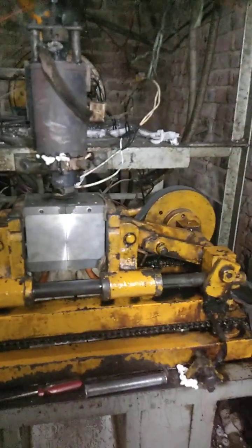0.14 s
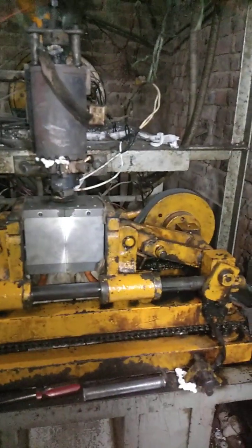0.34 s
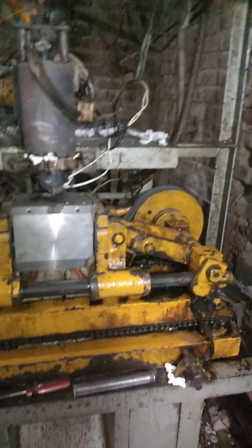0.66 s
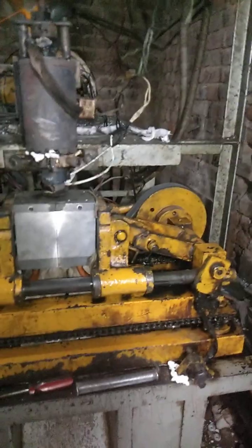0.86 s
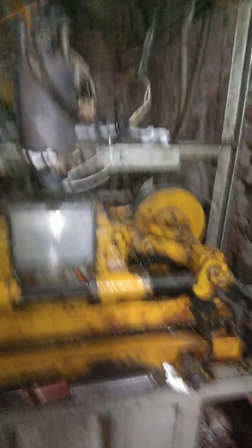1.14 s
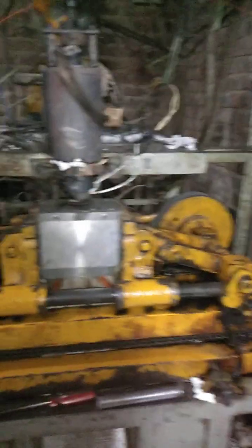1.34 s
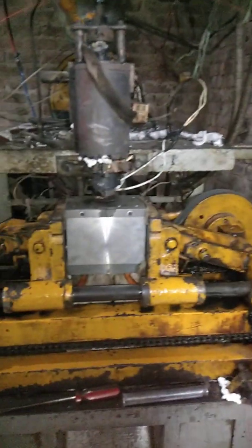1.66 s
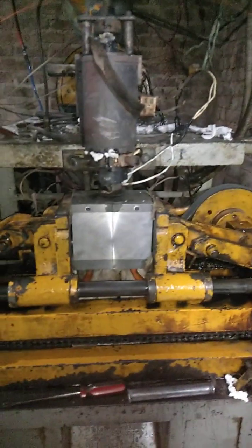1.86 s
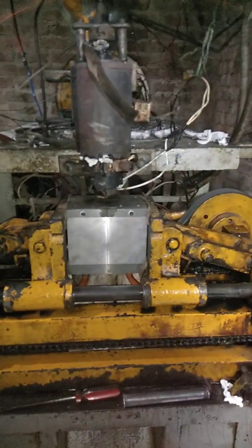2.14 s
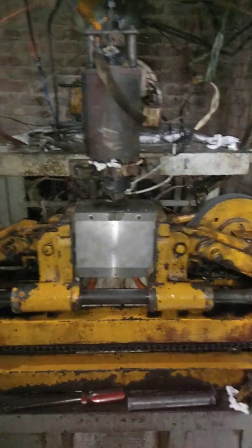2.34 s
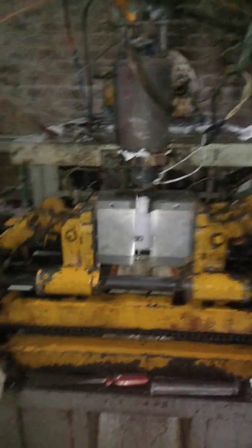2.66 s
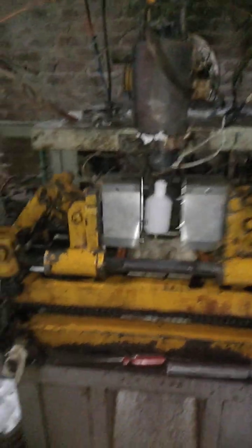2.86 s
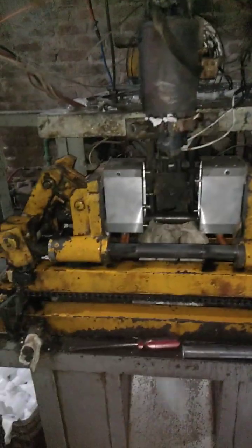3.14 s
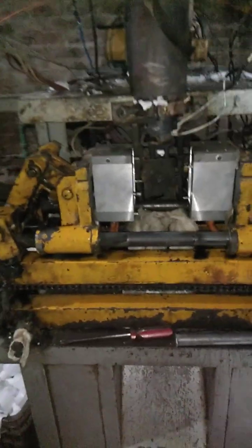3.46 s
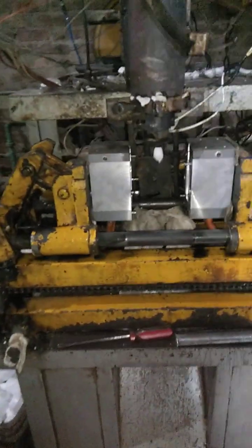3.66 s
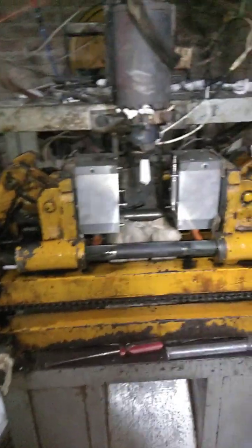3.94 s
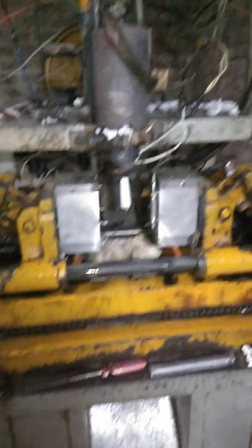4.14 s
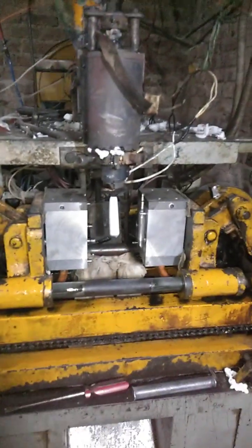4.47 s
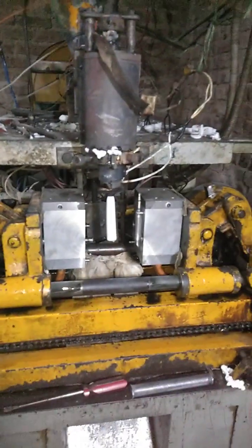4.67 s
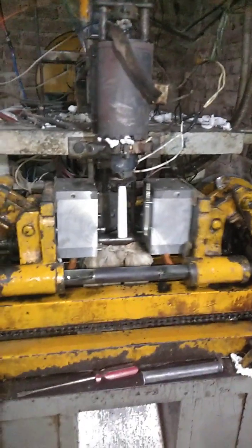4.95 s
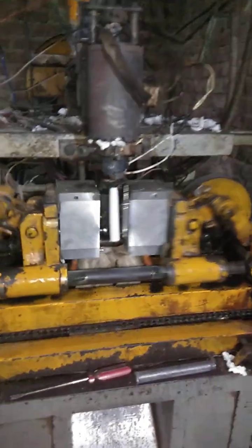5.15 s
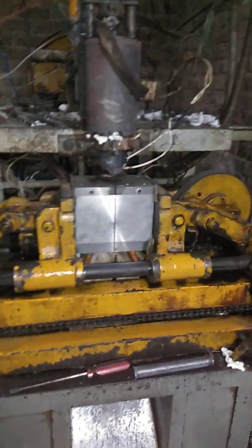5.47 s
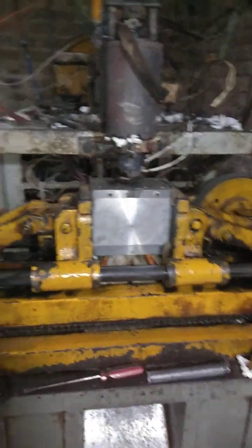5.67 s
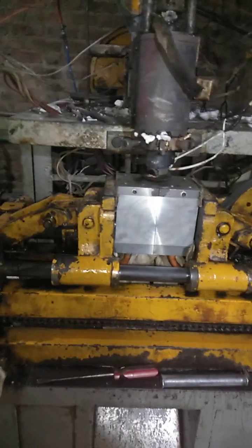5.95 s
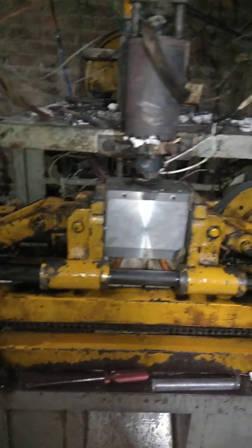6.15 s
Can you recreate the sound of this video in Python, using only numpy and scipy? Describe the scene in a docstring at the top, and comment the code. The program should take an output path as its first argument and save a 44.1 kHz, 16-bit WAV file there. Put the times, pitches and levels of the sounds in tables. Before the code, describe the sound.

Over a quiet workshop hum, a few faint clicks lead to a clank and a sudden burst of air that trails into a hiss. A blow-moulding machine's geared motor starts rumbling and whining, its chain rattling. Loud air puffs fire as the mould halves clang against their stops. The drive runs on with scattered steel knocks, then eases, with a tiny squeak and a soft swell of air. The sound is mono, with a short room echo.

```python
"""A blow-moulding machine in a quiet workshop. Over the room's hum come a few faint clicks, then a valve
dumps the blowing air in a burst and a long hiss. A geared motor rumbles and whines, its chain rattling
as it pulls the mould open. An air jet puffs the bottle out while the mould halves ring on their stops.
The mould closes, a slide squeaks, and fresh blowing air swells. All through the cycle, links, latches
and stops knock the steel frame."""
import sys
import numpy as np
from scipy import signal
from scipy.fft import rfft, irfft, next_fast_len
from scipy.io import wavfile
from scipy.ndimage import uniform_filter1d, map_coordinates

SR = 44100
rng = np.random.default_rng(int(sys.argv[2]) if len(sys.argv) > 2 else 0)


def bounce(signal):
    """Save signal as a 16-bit WAV file at the path given by the first command-line argument."""
    frames = np.transpose(np.atleast_2d(signal))
    limited = np.clip(frames, -1, 1)
    pcm = np.round(limited * 32767).astype(np.int16)
    wavfile.write(sys.argv[1], SR, pcm)


N = 278477
T = np.arange(N) / SR

# Noise colours. Each row: frequency in Hz, relative level in dB.
ROOM_COLOUR = [(15, -45), (25, -21.5), (53, -1.5), (221, -13.5), (390, -13), (568, -18), (616, -15),
               (785, -16), (851, -16), (1110, -18), (1210, -16.5), (9350, -22.5), (10400, -27),
               (12600, -32), (15600, -22.5)]
VENT_COLOUR = [(410, -25), (700, -18), (840, -16), (1470, -17), (1950, -8), (2850, -10), (3550, -7.5),
               (4910, -7), (6200, -4.5), (8150, -8), (10700, -25.5), (14100, -34.5), (15600, -30)]
RUMBLE_COLOUR = [(59, -46), (100, -7.5), (169, -0.5), (338, -8.5), (462, -4.5), (550, -9), (663, -4),
                 (788, -13.5), (1600, -23.5), (2080, -20), (3520, -120)]
CHAIN_COLOUR = [(530, -4.5), (900, 2), (1230, -8), (1330, -7), (1630, -5.5), (1880, -4.5), (2540, -7.5),
                (3850, -15.5), (5770, -27.5), (7770, -30), (8340, -36), (10700, -50.5), (15500, -43.5)]
EJECTOR_COLOUR = [(710, -21), (1200, -13.5), (1690, -12), (2210, -3), (2830, -2.5), (3990, -1), (4950, -3),
                  (6130, -1.5), (7200, -4), (7770, 0.5), (10600, -12), (13400, -17), (15600, -7)]
BLOW_COLOUR = [(880, -45), (1500, -13.5), (2420, -3), (2890, -7), (2980, -9), (5740, 3), (6920, -7),
               (8090, -7), (10100, -27), (15600, -15)]
# Resonances of steel and air cavities. Each row: pitch in Hz, width in Hz, relative level in dB.
STEEL_MODES = [(111, 29, 1), (168.3, 21, 3), (264, 112, -6.5), (332.5, 29, 0), (356, 111, -4),
               (452, 48, 0.5), (541, 58, -4), (651, 70, -5), (828, 27, 7), (1025, 74, 5), (1290, 170, 2),
               (1702, 123, -1.5), (1946, 93, 0.5), (2120, 118, 1.5), (2310, 116, 2.5), (2620, 170, -2.5),
               (2855, 81, 5), (3200, 190, 5.5), (3604, 87, 8.5), (4180, 920, 6), (5280, 340, 4),
               (5550, 200, -0.5), (6170, 75, 13), (6390, 930, 3), (7210, 300, 6.5), (7550, 95, 12),
               (8250, 380, 3), (8760, 270, 7), (10200, 4200, -3.5), (15000, 1500, -8)]
VALVE_CAVITIES = [(2600, 60, -6), (4300, 90, -6), (3560, 200, -6), (5960, 90, 0), (6360, 90, 1),
                  (6850, 90, -1), (7240, 90, -2), (8050, 120, -3), (14300, 900, 6)]
FRAME_MODES = [(112.4, 11.7, -9), (176.6, 8.1, 0.5), (255, 14, -3.5), (296, 30.6, -6), (375, 48, -7),
               (452, 15, -1), (501.5, 10, -2.5), (925, 79, -6.5), (855, 39, -19)]
NOZZLE_CAVITIES = [(4000, 110, -10), (4760, 36, 1), (5630, 140, -1), (6050, 45, 3.5), (6540, 60, 4),
                   (7590, 59, -3), (7900, 96, -8), (8370, 28, -2)]
# Fader curves. Each row: time in seconds, level in dB.
HISS_SWELL = [(0, -62), (.1, -82), (.25, -76), (.37, -62), (.5, -73), (.6, -85)]
LOW_SWELL = [(.2, -85), (.3, -65), (.45, -68), (.56, -68)]
BLOW_SWELL = [(6.17, -60), (6.27, -46.5), (6.32, -44)]
# A distant mains-driven motor. Each row: pitch in Hz, level in dB.
MOTOR_HUM = [(48.4, -71), (393.0, -79.5), (441.4, -81.5), (489.9, -80), (602.9, -84)]
# The workshop's reverb. Each row: frequency in Hz, time to fall 60 dB in seconds.
WALL_DECAY = [(150, 0.4), (2000, 0.18), (12000, 0.11)]
# Latches, stops and levers. Each row: start in seconds, relative levels of clank, thud and tick in dB,
# pitches of clank, thud and tick in Hz, base decay time of the chatter in seconds.
LATCH_HITS = [ (0.743, -74, -54, -80, 1220, 292, 9800, .038),
              (1.186, -58, -75, -58, 3050, 121, 6270, 0.043), (1.644, -40, -35, -42, 1860, 410, 5500, 0.18),
              (1.6694, -20, -20.5, -21, 460, 204, 6330, 0.075),
              (2.2074, -44, -52.5, -40.5, 2220, 484, 7460, .11),
              (2.2264, -42, -62, -41, 3100, 497, 8260, 0.078),
              (2.2764, -66, -55, -42.5, 1150, 440, 8400, 0.075),
              (2.2965, -36, -30, -39, 1200, 364, 4800, 0.24),
              (2.3579, -43, -29.5, -36, 1840, 180, 5470, 0.034),
              (2.404, -58, -48, -56, 2500, 400, 8500, 0.035),
              (2.5287, -29.5, -28, -36.5, 1790, 465, 4460, 0.18),
              (2.6659, -36.5, -41, -59, 1490, 385, 5100, .36),
              (2.7073, -33, -41, -48, 1430, 173, 4660, 0.071), (2.98, -22, -20, -37, 2370, 393, 7760, 0.4),
              (3.0472, -11.5, -15, -17.5, 2570, 408, 6200, 0.13),
              (3.1784, -16.5, -33, -37, 2420, 447, 7800, 0.3),
              (3.188, -22, -24.5, -17, 2810, 765, 7640, 0.13),
              (3.198, -17, -14, -16.5, 2900, 297, 7350, 0.067),
              (3.2783, -26.5, -22, -32.5, 2180, 210, 4360, 0.074),
              (3.3748, -23.5, -18, -26.5, 1400, 334, 4430, 0.046),
              (3.49, -42, -30.5, -44.5, 1070, 443, 4590, 0.23),
              (3.532, -43, -41, -38, 3000, 450, 5200, 0.044),
              (3.5685, -24.5, -33, -39, 2560, 666, 4470, .039),
              (3.7938, -58, -24, -63, 1090, 440, 4090, 0.018),
              (4.944, -39, -29, -32.5, 1840, 440, 8100, 0.14),
              (4.9578, -24, -21.5, -24, 1920, 217, 5070, .12),
              (4.985, -25.5, -29, -48, 1890, 200, 4900, 0.074),
              (5.007, -35, -22, -54, 1700, 270, 4300, 0.054),
              (5.1995, -26.5, -36, -33, 3140, 170, 6430, 0.09),
              (5.4222, -37.5, -35, -55, 1000, 165, 6850, 0.1),
              (5.431, -43, -50, -51, 3000, 450, 7000, 0.03),
              (5.4437, -33, -31.5, -34, 2100, 176, 5350, 0.083),
              (5.5667, -40, -31.5, -75, 640, 290, 4270, 0.06),
              (5.754, -38, -31.5, -59, 1770, 162, 6000, 0.14),
              (6.1104, -44, -44, -45, 3700, 335, 4120, 0.043),
              (6.12, -31, -33.5, -25.5, 2680, 435, 7650, 0.21),
              (6.1288, -34.5, -19.5, -36, 1330, 314, 7500, 0.061)]
# Chain links slapping onto the sprocket. Each row: start in seconds, relative clank level in dB.
LINK_HITS = [(2.417, -42), (2.819, -29), (3.4414, -30.5), (3.5433, -32), (3.6894, -32.5), (3.713, -35.5),
             (3.77, -30), (3.8563, -40), (3.918, -33.5), (3.9831, -38), (4.0551, -48), (4.1249, -31.5),
             (4.3108, -41), (4.4162, -36), (4.5544, -27.5), (4.7652, -32), (5.075, -42), (5.109, -40.5),
             (5.239, -36), (5.6019, -36), (5.6637, -44.5), (5.8092, -51), (5.894, -46), (5.988, -33.5)]
# Heavy parts starting and stopping. Each row: start in seconds, level in dB.
FLOOR_JOLTS = [(1.67, -58), (2.3, -39.5), (2.56, -44), (2.89, -42.5), (3.2, -35), (4.05, -55), (4.44, -46),
               (4.97, -35.5), (5.548, -43.5), (5.87, -45)]
# The running drive. Each row: time in seconds, rumble level in dB, relative chain level in dB.
DRIVE_LEVELS = [(2.24, -55, -54), (2.32, -49.5, -45), (2.47, -41, -47.5), (2.9, -36, -45.5),
                (3.07, -34.5, -22.5), (3.19, -34.5, -64), (3.29, -33.5, -35.5), (3.48, -36, -39.5),
                (4.2, -35, -40), (5.05, -37, -41.5), (5.22, -41, -52), (5.67, -45, -53.5),
                (6.19, -42, -48.5), (6.25, -50, -78)]
# Gear pairs while opening, idling and closing. Each row: start and end in seconds, first and last pitch
# in Hz, first and last level in dB, pitch waver in Hz, level waver in dB.
GEAR_MESHES = [(2.38, 2.9, 646, 656, -51, -47, 2, 1.5), (3.4, 4.85, 660, 668, -46, -48, 3.8, 3),
               (4.97, 6.12, 651, 643, -47.5, -50.5, 1.6, 1.8), (3.24, 4.9, 908, 906, -48, -53, 6.9, 4),
               (5.05, 6.1, 853, 843, -60, -65, 3.9, 3.5)]
# The drive's fuzzy tones. Each row: start and end in seconds, pitch in Hz, first and last level in dB.
FUZZY_TONES = [(2.405, 2.847, 2010, -53, -71), (3.41, 4.923, 2090, -57, -63), (3.45, 4.95, 4480, -65, -57),
               (4.996, 6.12, 1853, -56, -58.5), (5.2, 6.1, 3800, -68, -69)]
# The ejector's puffs. Each row: start and end in seconds, first and last level in dB.
EJECTOR_PUFFS = [(2.867, 2.896, -32.5, -34), (2.895, 2.97, -16, -23.5), (2.968, 3.067, -31, -21),
                 (3.109, 3.177, -22, -23), (3.178, 3.204, -19, -29)]
# The mould halves hit their stops and bounce. Each row: start in seconds, relative level in dB.
MOULD_HITS = [(3.0467, -13), (3.0525, -13), (3.1883, -8), (3.1935, -18)]
# Their ring. Each row: pitch in Hz, relative level in dB, time to fall 60 dB in seconds.
MOULD_MODES = [(2240, -7, .07), (2445, -6, .06), (2612, -4, .08), (2832, 0, .075), (3035, -4, .08)]
# A rubbing slide. Each row: time in seconds, pitch in Hz, level in dB.
SQUEAK_PATH = [(5.602, 9040, -49), (5.616, 8960, -55), (5.64, 8900, -66), (5.7, 9000, -67)]

TONE_FADE_S = .04  # the drive's tones come and go within this


def amp(db):
    return 10 ** (np.asarray(db) / 20)


def unit(x):
    return x / np.sqrt(np.mean(x ** 2) + 1e-20)


def along(points, hz):
    """Read (Hz, value) points on a log frequency axis."""
    f, v = np.transpose(points)
    return np.interp(np.log(hz + 1), np.log(f + 1), v)


def fader(rows, column=1):
    """Gain along a curve of seconds and dB, silent outside it."""
    rows = np.asarray(rows)
    return amp(np.interp(T, rows[:, 0], rows[:, column], left=-120, right=-120))


def span(start, end, first_db, last_db, fade):
    """Gain that fades in, slides from one level to another and fades out."""
    edges = np.clip(np.minimum(T - start, end - T) / fade + .5, 0, 1)
    return edges * amp(np.interp(T, [start, end], [first_db, last_db]))


def dying(start, db, rise, t60):
    """Gain that rises from a start time and then decays."""
    t = np.maximum(T - start, 0)
    return amp(db - 60 * t / t60) * (1 - np.exp(-t / rise))


def wobble(rate):
    """A smooth random curve, rate knots a second."""
    return map_coordinates(rng.standard_normal(int(N * rate / SR) + 4), [T * rate])


def filtered(x, response):
    """Equalise x with a complex response of frequency."""
    size = next_fast_len(N + SR // 2)
    return irfft(rfft(x, size) * response(np.fft.rfftfreq(size, 1 / SR)), size)[:N]


def resonance(modes, f):
    """Response at f of (Hz, width, dB) resonances of alternating polarity."""
    return sum((-1) ** k * amp(db) * 1j * f * width / (hz * hz - f * f + 1j * f * width)
               for k, (hz, width, db) in enumerate(modes))


def noise(colour, ring=(), ring_db=0, flutter=1):
    """Coloured noise of rms 1, with optional resonances on top and a flutter in level."""
    def response(hz):
        return amp(along(colour, hz)) * np.hypot(1, amp(ring_db) * abs(resonance(ring, hz)))
    return unit(filtered(flutter * rng.standard_normal(N), response))


def patchy(x, depth_db):
    """Give x slow random swells, each about a kHz wide."""
    bands = signal.stft(x, nperseg=512)[2]
    swells = uniform_filter1d(rng.standard_normal(bands.shape), size=16, axis=0)
    swells = uniform_filter1d(swells, size=30, axis=1)
    return signal.istft(bands * amp(depth_db * unit(swells)), nperseg=512)[1][:N]


def walls(x):
    """The room's answer to x: a short reverb whose treble dies first."""
    hz, t, bands = signal.stft(rng.standard_normal(SR // 2), SR, nperseg=256)
    tail = signal.istft(bands * amp(-60 * t / along(WALL_DECAY, hz)[:, None]), SR, nperseg=256)[1]
    return signal.fftconvolve(np.pad(x, (400, 0)), tail / np.linalg.norm(tail))[:N]


def room_tone():
    """A bed of noise and a far motor's hum; a faint hiss and a soft rumble pass at the start."""
    bed = amp(-62.5 + .75 * wobble(15)) * patchy(noise(ROOM_COLOUR), depth_db=1.5)
    hum = sum(np.sqrt(2) * amp(db + 1.7 * wobble(6.7)) * np.sin(2 * np.pi * (hz * T + rng.random()))
              for hz, db in MOTOR_HUM)
    hiss = noise([(4500, -18), (5800, -10), (6800, -10), (8000, -5), (9500, -15), (12000, -60)])
    rumble = noise([(100, -36), (200, -6), (280, -5), (400, -17), (700, -32)])
    return bed + hum + fader(HISS_SWELL) * hiss + fader(LOW_SWELL) * rumble


def steel_knocks():
    """A sharp contact, then loose steel chattering, rings the frame in three layers: clank, thud, tick."""
    size = 16384
    out, t, f = np.zeros(N + size), np.arange(size) / SR, np.fft.rfftfreq(size, 1 / SR)
    each_mode = np.array([(-1) ** k * resonance([(hz, max(width, 22, .03 * hz), db)], f)
                          for k, (hz, width, db) in enumerate(STEEL_MODES)])
    mode_hz = np.array(STEEL_MODES)[:, 0]
    rise_s = np.array([[.001], [.004], [.0012]])  # the thud swells later
    stretch = np.array([[1.05], [1.3], [.8]])  # and lasts longer
    falloff_db = np.array([[6], [3.5], [8]])  # lost by a mode half an octave from the layer's pitch
    snap_band = np.array([[0], [0], [1]]) * 1j * f / (3500 + 1j * f) / (1 + 1j * f / 9000)  # tick only
    latch_snap_db, link_snap_db, snap_t60 = -7, -11, .06  # the unpitched snap of small parts
    link_hz, link_t60 = (1914, 324, 4780), .12
    latches = [(*row, latch_snap_db) for row in LATCH_HITS]
    links = [(start, db, db - 3.5, db - 9.5, *link_hz, link_t60, link_snap_db) for start, db in LINK_HITS]
    for start, *layers, t60, snap_db in latches + links:
        db, hz = np.reshape(layers, (2, 3, 1))
        grit = rng.standard_normal((3, size)) * amp(.42 * np.repeat(rng.standard_normal(size // 128), 128))
        chatter = grit * (1 - np.exp(-t / rise_s)) * amp(-60 * t / (stretch * max(t60, .02)))
        chatter[:, 1] += [10, 9, 3]  # the first contact
        scatter_db = rng.normal(0, 2, (3, len(STEEL_MODES)))
        share = amp(-falloff_db * (2 * np.log2(mode_hz / hz)) ** 2 + scatter_db)
        ring = rfft(chatter) * (share @ each_mode)
        snap = rfft(chatter * amp(snap_db - 60 * t / snap_t60)) * snap_band
        hit = irfft(ring + snap)
        loudest = np.sqrt(uniform_filter1d(hit ** 2, size=400).max(axis=1, keepdims=True))
        out[round(start * SR):][:size] += np.sum(amp(db - 4.5) * hit / loudest, axis=0)
    return out[:N]


def valve_vent(turbulence):
    """The valve opens at once: a short burst rides on the mould's slow draining, which the walls echo."""
    start, rise = 1.669, .0055
    burst = dying(start, -17.5, rise, t60=.23) * noise(VENT_COLOUR, VALVE_CAVITIES, 5.6, turbulence)
    drain = dying(start, -36, rise, t60=1.81) * noise(VENT_COLOUR, VALVE_CAVITIES, 6.3, turbulence)
    return burst + drain + amp(4) * walls(drain)


def floor_shudder():
    """The floor shudders at each jolt and trembles under the drive."""
    jolts = sum(dying(start, db, rise=.014, t60=.7) for start, db in FLOOR_JOLTS)
    tremble = amp(-17) * fader(DRIVE_LEVELS)
    bass = noise([(20, -62), (40, -33), (60, -5.5), (110, -6), (150, -4), (300, -120)])
    return np.hypot(jolts, tremble) * bass


def motor_rumble():
    """The motor shakes the frame's low modes in lumps."""
    lumps = amp(1.3 * wobble(45) + 1.5 * wobble(120))
    return fader(DRIVE_LEVELS) * noise(RUMBLE_COLOUR, FRAME_MODES, ring_db=11, flutter=lumps)


def chain_rattle():
    """Each link seats sharply and dies away, in uneven little bursts that the walls echo."""
    links_passed = np.cumsum(amp(2.9 * wobble(14))) * 16 / SR  # about 16 a second
    bursts = amp(-14 * (links_passed % 1)) * amp(2.5 * wobble(12))
    rattle = noise(CHAIN_COLOUR, flutter=.7 + bursts)
    treble = filtered(rattle, lambda hz: np.clip(np.log2(hz / 2500 + 1e-9), 0, 1.5))
    chain = amp(-6) * fader(DRIVE_LEVELS, column=2) * (rattle + amp(2) * treble)
    return chain + amp(-1) * walls(chain)


def gear_whine():
    """Meshing teeth make one tone for each gear pair, wavering in pitch and strength."""
    out = np.zeros(N)
    for start, end, first_hz, last_hz, first_db, last_db, waver_hz, waver_db in GEAR_MESHES:
        hz = np.interp(T, [start, end], [first_hz, last_hz]) + waver_hz * wobble(30)
        gain = span(start, end, first_db, last_db, TONE_FADE_S) * amp(waver_db * wobble(16))
        out += np.sqrt(2) * gain * np.sin(2 * np.pi * np.cumsum(hz) / SR)
    return out


def drive_singing():
    """The drive sings in fuzzy high tones, each one noise ringing in a resonance."""
    out = np.zeros(N)
    fuzz = .09  # resonance width over pitch
    for start, end, hz, first_db, last_db in FUZZY_TONES:
        band = filtered(rng.standard_normal(N), lambda f: resonance([(hz, fuzz * hz, 0)], f) ** 2)
        out += span(start, end, first_db, last_db, TONE_FADE_S) * amp(2.7 * wobble(9)) * unit(band)
    return out


def ejector_jet(turbulence):
    """Puffs of air, each with a short tail, whistle faintly through the nozzle's cavities."""
    rise = .004
    puffs = sum(span(start, end, first_db, last_db, rise) + dying(end, last_db - 8.5, rise, t60=.35)
                for start, end, first_db, last_db in EJECTOR_PUFFS)
    return puffs * noise(EJECTOR_COLOUR, NOZZLE_CAVITIES, ring_db=6, flutter=turbulence)


def mould_clang():
    """The aluminium halves hit their stops and ring on a few close modes."""
    out, t = np.zeros(N), np.arange(SR // 4) / SR
    for start, db in MOULD_HITS:
        ring = sum(amp(mode_db + rng.normal(0, 3.6) - 60 * t / t60) * np.sin(2 * np.pi * hz * t)
                   for hz, mode_db, t60 in MOULD_MODES)
        out[round(start * SR):][:len(t)] += amp(db - 5) * ring
    return out


def slide_squeak():
    """A slide rubs: a thin wavering tone that starts sharply and fades."""
    times, hz, _ = np.transpose(SQUEAK_PATH)
    pitch = np.interp(T, times, hz) + 110 * wobble(400)
    tone = np.sin(2 * np.pi * np.cumsum(pitch) / SR)
    return np.sqrt(2) * fader(SQUEAK_PATH, column=2) * amp(2.1 * wobble(80.6)) * tone


def blowing_air(turbulence):
    """A jet of air swells in the closed mould."""
    return fader(BLOW_SWELL) * noise(BLOW_COLOUR, flutter=turbulence)


def scene():
    """Mix the metal and its echo with the air, the drive, the floor and the room tone, in mono."""
    metal = steel_knocks() + mould_clang() + slide_squeak()
    turbulence = amp(1.55 * wobble(60))  # the flutter of all three jets
    air = valve_vent(turbulence) + ejector_jet(turbulence) + blowing_air(turbulence)
    drive = motor_rumble() + chain_rattle() + gear_whine() + drive_singing()
    return (metal + amp(-13) * walls(metal) + air + drive + floor_shudder() + room_tone())[None]


def record(dry):
    """The microphone loses the deepest bass, and a steep cut takes off the very top."""
    low_hz, top_hz = 27, 15500

    def response(hz):
        low_cut = (1j * hz / (low_hz + 1j * hz)) ** 2
        high_cut = np.clip((top_hz - hz) / 150 + .5, 0, 1)
        return low_cut * high_cut
    return filtered(dry[0], response)[None]


dry = scene()
out = record(dry)
bounce(out)
```